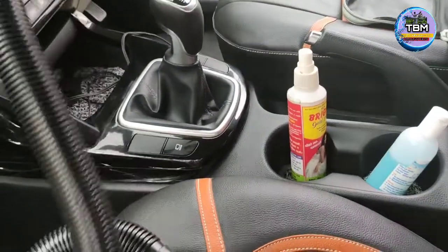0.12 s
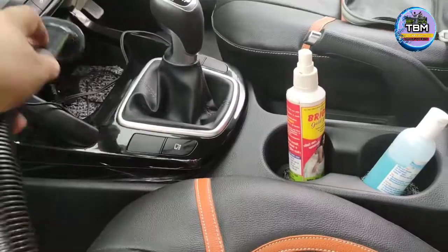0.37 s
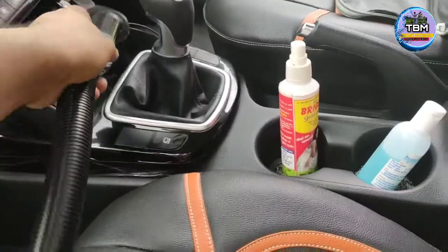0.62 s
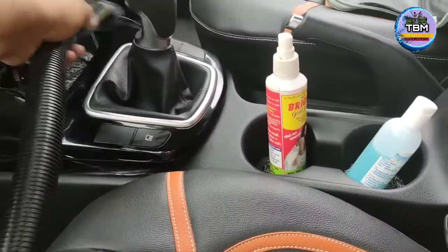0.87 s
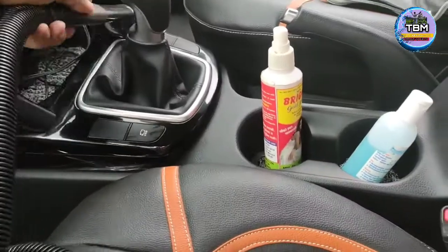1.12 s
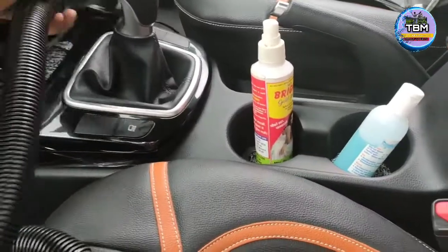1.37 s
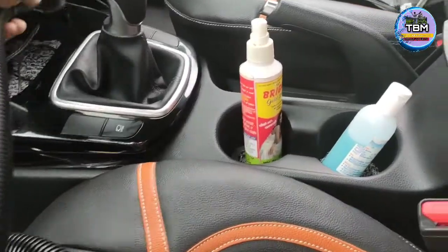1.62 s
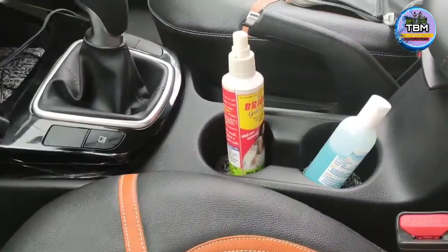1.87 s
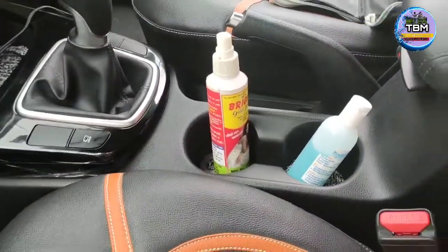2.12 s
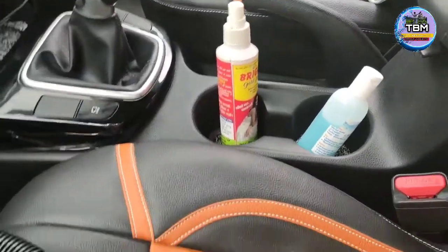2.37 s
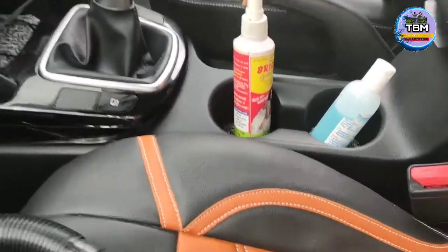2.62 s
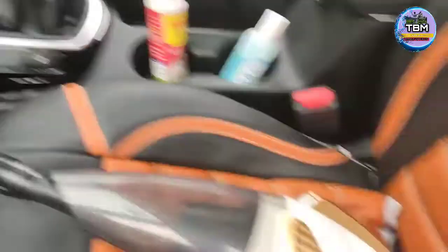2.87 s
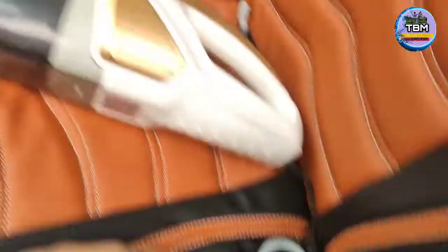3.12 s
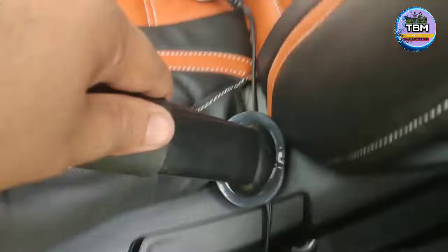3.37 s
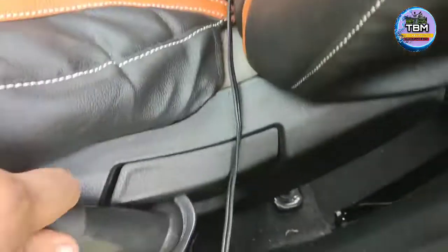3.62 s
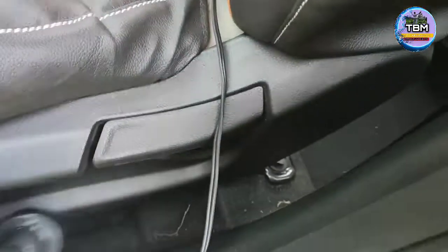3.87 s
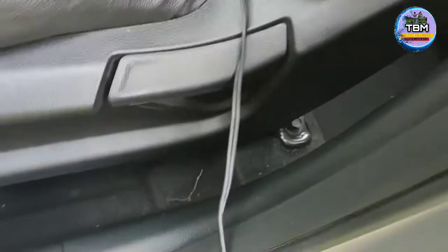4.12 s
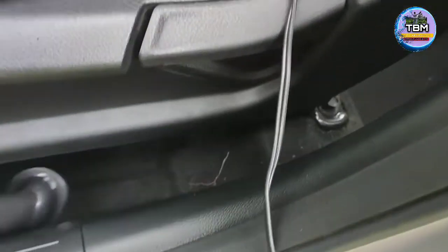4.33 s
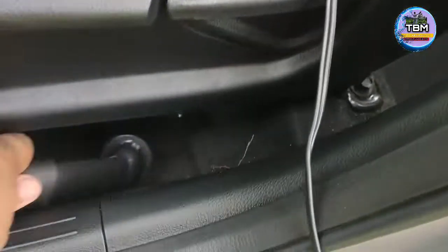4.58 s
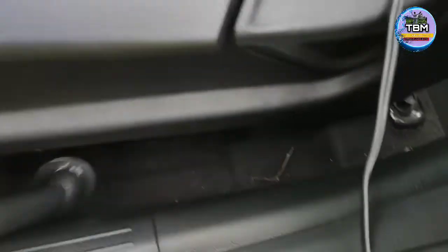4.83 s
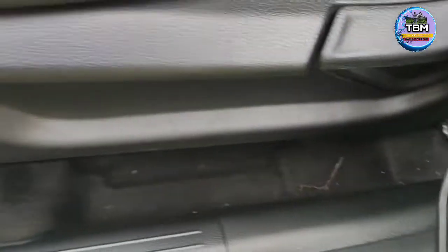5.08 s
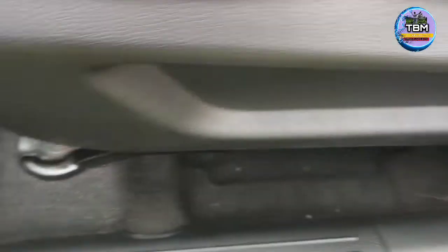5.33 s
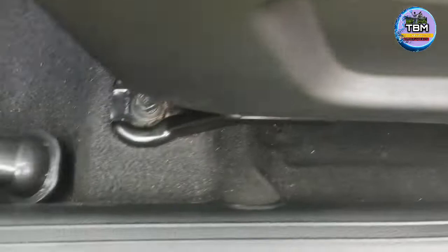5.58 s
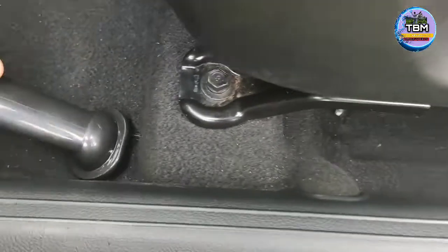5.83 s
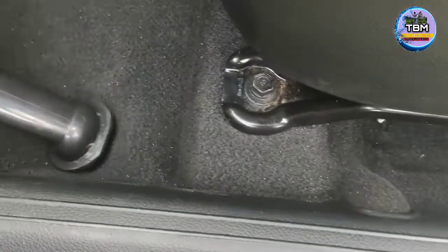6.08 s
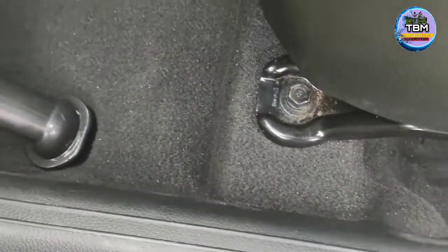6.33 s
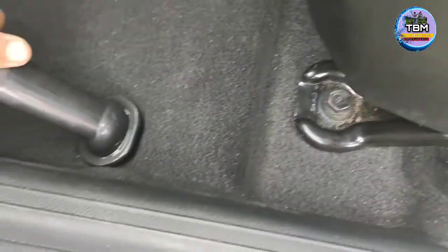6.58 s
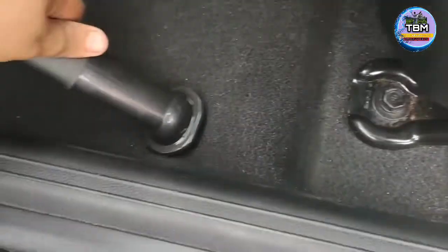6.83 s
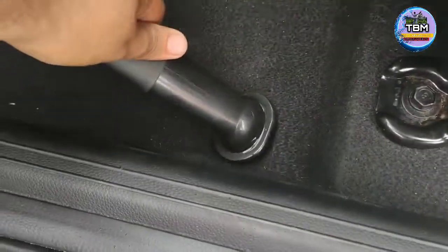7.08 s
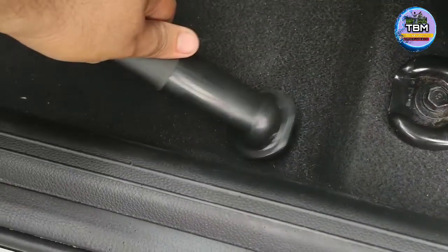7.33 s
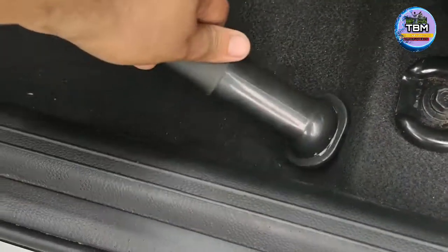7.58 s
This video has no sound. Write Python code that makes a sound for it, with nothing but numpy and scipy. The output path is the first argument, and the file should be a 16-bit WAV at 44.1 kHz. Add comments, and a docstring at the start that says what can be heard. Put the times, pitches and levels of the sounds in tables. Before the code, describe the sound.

A small vacuum cleaner runs steadily inside a car, whining and rushing with air, its whine swelling loud midway as the nozzle knocks against plastic trim.

```python
"""Handheld vacuum cleaner in a car cabin

A small vacuum cleaner runs while the listener moves from near the front seats, past the machine, down to the
floor. Shaft and fan tones are sines on multiples of one shaft angle, fading in the cabin's standing waves.
Air rushing through housing and hose, the dragging nozzle and the hiss at its gap are noise shaped in short
frames. The nozzle and hose bump the trim, which rings as decaying modes with a short cabin tail."""
import sys
import numpy as np
from scipy import signal
from scipy.io import wavfile
from scipy.ndimage import uniform_filter1d

SR = 44100
rng = np.random.default_rng(int(sys.argv[2]) if len(sys.argv) > 2 else 0)


def master(y):
    """Save y as 16-bit WAV."""
    cut = np.clip(np.atleast_2d(y).T, -1, 1)
    pcm = np.round(cut * 32767)  # scale
    wavfile.write(sys.argv[1], SR, pcm.astype(np.int16))


def invert_db(level):
    """Linear amplitude ratio for a level in decibels (20 dB per decade), elementwise."""
    return 10 ** (np.asarray(level, dtype=float) / 20)


N = 339570  # 7.7 s

# how the air moves: [t/s, rush/dB (only its changes count), rush left over right/dB, nozzle drag/dB]
AIRFLOW = [(0.0, -40.5, 4.5, -60), (0.6, -42, 4.5, -71), (0.9, -42, 8.5, -62), (1.2, -42.5, 9, -67),
           (1.75, -42, 6, -67), (2.17, -42.5, 5, -74), (2.81, -42.5, 4, -76), (3.15, -41, 9, -63),
           (3.37, -38.5, 3.5, -65), (3.8, -39.5, 6.5, -64), (4.07, -41, 5.5, -69), (4.27, -40.5, 5, -60),
           (4.63, -39, 8, -64.5), (4.93, -40.5, 7.5, -56.5), (5.21, -38.5, 5, -56),
           (5.36, -42.5, 10, -62.5), (5.6, -42.5, 9, -73), (5.9, -43, 7.5, -68), (6.75, -43.5, 3, -79),
           (7.7, -44.5, 2.5, -75)]


def evened(x):
    """Scales to an rms of 1."""
    return x / np.sqrt(np.mean(abs(x) ** 2) + 1e-20)


def over_hz(hz, table):
    """Columns of a table read on a log frequency axis."""
    f, *columns = np.transpose(table)
    return np.array([np.interp(np.log(hz + 1), np.log(f + 1), c) for c in columns])


def over_time(t, table):
    """Columns of a table read along time."""
    s, *columns = np.transpose(table)
    return np.array([np.interp(t, s, c) for c in columns])


def drift(t, top_hz, count=1):
    """Slow chance: sines of random phase up to top_hz, the slow ones strongest; rms 1."""
    hz = np.geomspace(top_hz / 30, top_hz, 16)
    phase = rng.random((count, 16, 1))  # in turns
    waves = np.sin(2 * np.pi * (hz[:, None] * t + phase)) / np.sqrt(hz[:, None])
    return evened(waves.sum(1))


def nearness(t):
    """Share of each of the three places along time, crossfading as the listener moves."""
    # where the listener is: [t/s, place (0 front seats, 1 beside the machine, 2 floor)]
    path = [(0, 0.27), (2.75, 0), (3.15, 1.02), (5.3, 0.96), (5.55, 2), (7.7, 2)]
    return np.clip(1 - abs(over_time(t, path) - np.arange(3)[:, None]), 0, 1)


def shaft_angle(t, coarse):
    """Running angle of the motor shaft in radians: its speed summed over time, with a little jitter."""
    # [t/s, shaft turns per second/Hz]
    speed = [(0.0, 409.5), (1.65, 409.35), (2.75, 409.3), (4.4, 410.1), (4.95, 409.8), (5.5, 409.9),
             (6.6, 410.7), (7.15, 410.4), (7.7, 410.4)]
    jitter_rad = 0.04 * drift(coarse, 40)[0]
    return 2 * np.pi * np.cumsum(over_time(t, speed)[0]) / SR + np.interp(t, coarse, jitter_rad)


def strong_tones(t, angle):
    """Shaft hum, its orders and the blade whine, as the standing waves bring them to each ear."""
    # all four: [t/s, left level/dB, right level/dB, left lead/rad]
    shaft_hum = [(0.0, -37.5, -46, -0.5), (0.3, -37, -50, 1), (0.42, -35, -43, 0), (0.6, -36.5, -51, -0.5),
                 (1.06, -36.3, -48, 0.8), (1.24, -38, -62, 0.5), (1.4, -37, -55, 0.5), (1.6, -37, -55, 0),
                 (1.82, -34, -43, 0.5), (2.18, -34, -41, -0.7), (2.46, -35, -53, 0), (2.8, -38, -62, -3),
                 (3.02, -37.5, -54, -1.5), (3.26, -43, -38.5, -1.7), (4.26, -42, -37, -0.95),
                 (4.78, -38.5, -32, -1), (5.14, -39, -33, 0), (5.42, -35.5, -34.5, 0),
                 (5.98, -34.5, -37, 0.53), (7.7, -35, -38.5, 0.5)]
    # second multiple of the shaft speed, same columns
    second_order = [(0.0, -45.5, -51, -0.7), (0.5, -47, -53, 0.3), (0.9, -49.5, -55, -1.5),
                    (1.7, -50, -58, -2), (1.95, -49, -55, 0.5), (2.9, -46.5, -53, 0.5), (3.5, -62, -55, 1),
                    (4.4, -51.5, -59, 0.5), (4.9, -48, -47, -1), (5.25, -63, -66, -1.5),
                    (6.3, -53, -62, 1.5), (7.7, -61, -58, 1.5)]
    # fourth multiple, same columns
    fourth_order = [(0.0, -48, -54, -2.5), (0.22, -44, -40, -2.5), (0.4, -51, -37.5, -4.5),
                    (0.74, -43, -45, -4.5), (1.0, -56, -42.5, -4.5), (1.22, -45, -36.5, -2.5),
                    (1.54, -47, -40, -4.5), (2.0, -45, -43.5, -5), (2.46, -56, -39, -3.5),
                    (2.62, -58, -33, -3.5), (2.95, -38.5, -46, -5), (3.12, -44, -41, -4),
                    (3.28, -41, -40, -1.5), (3.55, -44, -62, -3.5), (3.94, -55, -45, -2.6),
                    (4.25, -46.5, -55, -2), (4.42, -42, -50, -3.5), (4.75, -41, -44, -0.5),
                    (4.94, -37.5, -47, 0.5), (5.2, -44, -49, 3), (5.54, -49, -36.5, 4),
                    (5.72, -37, -37.5, 4), (6.42, -35, -46, 4.5), (6.75, -36.5, -58, 4.5),
                    (7.02, -38, -46, 3.5), (7.5, -39.5, -43, 3.7), (7.7, -42.5, -47, 3)]
    # seven fan blades pass per turn, same columns
    blade_whine = [(0.0, -38, -38, 4), (0.12, -40, -37, 3.5), (0.2, -35.5, -34, 0.8), (0.45, -37, -35, 1),
                   (0.62, -40, -36.3, -1), (0.82, -37, -35, 1.8), (1.2, -50, -41, 2), (1.4, -40, -39.5, 8),
                   (1.65, -39.5, -44, 7), (1.84, -51, -32.5, 4.3), (1.94, -39, -32.5, 7),
                   (2.1, -52, -37.5, 4.5), (2.3, -38, -37, 4), (2.54, -41, -35, 4), (2.72, -36, -38, 4),
                   (2.79, -32, -34, 5), (2.86, -36, -35, 2.5), (2.99, -34, -33, 3.5), (3.02, -34, -30, 4.5),
                   (3.06, -46, -32, 1), (3.1, -35.5, -31.5, 0.5), (3.26, -22.5, -34, -2),
                   (3.4, -25.5, -42, -3), (3.54, -24.5, -30, -3), (3.72, -25, -57, 0),
                   (3.9, -25, -45, -2.5), (4.05, -27.5, -33.5, -2.5), (4.58, -23.5, -33.5, -2),
                   (4.9, -25, -46, -1.5), (5.1, -23, -40, 0.5), (5.33, -24.5, -35, -0.1),
                   (5.38, -34, -49, 1.8), (5.46, -47, -31.5, 5), (5.53, -39, -35, 3), (5.62, -40, -36, 4.5),
                   (5.81, -36.5, -51, 3.6), (6.18, -36.5, -39, 4.5), (6.6, -36, -34, 4),
                   (6.88, -34.5, -50, 3), (6.98, -35, -39, 7.5), (7.1, -38.5, -43, 7),
                   (7.45, -38.5, -44, 7.5), (7.62, -40.5, -44, 4), (7.7, -35, -49, 5)]
    out = np.zeros((2, N))
    for order, table in ((1, shaft_hum), (2, second_order), (4, fourth_order), (7, blade_whine)):
        left_db, right_db, lead = over_time(t, table)
        phase = order * angle + np.array([lead, -lead]) / 2
        out += invert_db([left_db, right_db]) * np.sin(phase)
    return out


def faint_tones(t, coarse, angle):
    """Fainter multiples of the shaft speed; each fades and shifts in phase by chance in each ear."""
    # the faint tones' multiples of the shaft speed
    faint_orders = [5, 8, 10, 14]
    # their mean levels: [seats left/dB, right/dB, beside left/dB, right/dB, floor left/dB, right/dB]
    faint_levels = [(-46, -48, -51, -51.5, -53, -61), (-47, -58, -42, -48.5, -48, -58),
                    (-49, -56, -51.5, -54, -59, -68), (-49, -60, -52, -56, -50, -67)]
    # their mean left lead [rad]
    faint_leads = [1.26, 2.7, 2.6, 1.8]
    # fastest fading of each [Hz]
    faint_flutters = [40, 30, 12, 20]
    # the weak tones' multiples of the shaft speed
    weak_orders = [3, 6, 9, 11, 13, 15, 19, 20, 21, 22, 23, 24, 26, 27, 34]
    # their mean levels: [left/dB, right/dB]
    weak_levels = [(-54.5, -62.5), (-53, -58), (-54, -57), (-56.5, -66), (-60, -88), (-63, -61), (-66, -62),
                   (-68, -57.5), (-68, -75), (-78, -62), (-84, -83), (-79, -72), (-85, -64), (-75, -74),
                   (-75, -87)]

    tones = []
    near = nearness(coarse)
    for order, db, lead, top_hz in zip(faint_orders, faint_levels, faint_leads, faint_flutters):
        tones.append((order, np.reshape(db, (3, 2)).T @ near, 4.0, lead, top_hz))
    rush_db = over_time(coarse, AIRFLOW)[0]  # the weak ones rise and fall with the rush of air
    for order, db in zip(weak_orders, weak_levels):
        tones.append((order, np.array(db)[:, None] + rush_db - rush_db.mean(), 3.0, 0, 6))

    out = np.zeros((2, N))
    wander_rad = 1.1
    for order, level_db, fading_db, lead, top_hz in tones:
        fade, shift = drift(coarse, top_hz, count=4).reshape(2, 2, -1)
        for ear in range(2):
            level = np.interp(t, coarse, invert_db(level_db[ear] + fading_db * fade[ear]))
            phase = np.interp(t, coarse, wander_rad * shift[ear] + lead * (.5 - ear))
            out[ear] += level * np.sin(order * angle + phase)
    return out


def motor():
    """All tones ride on the same shaft angle, so they bend in pitch together."""
    t = np.arange(N) / SR
    coarse = np.arange(0, N + 256, 256) / SR
    angle = shaft_angle(t, coarse)
    tones = strong_tones(t, angle) + faint_tones(t, coarse, angle)
    return np.sqrt(2) * tones  # table levels are rms


def smoothed(noise, bins, frames):
    """Random field averaged over frequency bins, then over time frames; rms 1."""
    return evened(uniform_filter1d(uniform_filter1d(noise, size=bins, axis=0), size=frames, axis=1))


def air_rush(t, hz):
    """Spectrum of air rushing through housing and hose: a broad slope, peaks and dips, and random ripples."""
    # slope of the air noise: [f/Hz, seats left/dB per Hz, right, beside left, right, floor left, right]
    air_slope = [(30, -101, -101, -104, -104, -101, -101), (154, -99, -99, -97.5, -98, -99, -99),
                 (297, -84, -85.5, -107, -93, -86.5, -102), (490, -72.5, -71, -75.5, -75, -78.5, -82),
                 (1005, -82, -72.5, -73.5, -75.5, -77, -79.5), (1550, -76, -76, -73.5, -69, -73, -70),
                 (3180, -68, -74, -64.5, -70.5, -73, -79), (4080, -73.5, -82, -76, -76, -79.5, -77),
                 (5500, -73, -76.5, -72, -80.5, -75.5, -81.5), (7940, -74, -85, -75.5, -81, -80.5, -86),
                 (9420, -91.5, -83.5, -85.5, -89, -89.5, -95.5), (12700, -89, -97, -89.5, -100, -90, -99),
                 (15600, -99, -103, -100, -104, -102, -105), (15300, -122, -124, -122, -124, -124, -126)]
    # peaks (+) and dips (-) in the air noise's spectrum: [f/Hz, width/Hz, seats/dB, beside/dB, floor/dB]
    peaks_and_dips = [(295, 80, 3, 6, -13), (547, 210, -0.5, 0.5, -1), (707, 225, -12, 8.5, 1.5),
                      (804, 180, 8.5, -2, 6), (1040, 210, -7.5, 1, -2.5), (1205, 120, 0.5, 5.5, 6),
                      (1474, 240, 0.5, -8.5, -2), (1890, 280, 3.5, 4.5, 4.5), (2060, 97, 9.5, 2, 3.5),
                      (2613, 256, -15.5, -11, -11.5), (2895, 79, -1.5, 7, 3.5), (3275, 60, 5, -1, 1.5),
                      (3570, 150, 5.5, -9, 0), (3812, 79, 11, 5, 8.5), (4530, 99, 6.5, 5, 5.5),
                      (5170, 330, -2.5, -1, 0), (5840, 210, -5, -12, -15), (6900, 780, 1.5, 1.5, 2.5),
                      (9780, 280, -11, -14, 6)]
    near = nearness(t)
    centre, width, *height_db = np.transpose(peaks_and_dips)
    contour = np.exp(-np.square(2 * (hz[:, None] - centre) / width)) @ np.transpose(height_db)
    slope = over_hz(hz, air_slope).reshape(3, 2, -1).transpose(1, 2, 0)

    rush_db, pan_db, _ = over_time(t, AIRFLOW)
    # change about each place's mean
    rush_db, pan_db = (v - near.T @ (near @ v / near.sum(1)) for v in (rush_db, pan_db))
    treble = np.clip(hz / 4000, .3, 1)[:, None]  # distance and shadow act most on the treble
    moved_db = treble * (rush_db + np.array([pan_db, -pan_db])[:, None] / 2)

    p, q, r, s = rng.standard_normal((4, len(hz), len(t)))
    patches = np.array([smoothed(v, 12, 14) for v in (p, q)])
    comb = np.array([smoothed(v, 3, 90) for v in (r, s)])  # cabin reflections
    flicker = smoothed(p + r, 150, 4)  # broad and quick, alike in both ears
    ripple_db = 1.32 * patches + 2.3 * comb + 0.3 * flicker
    return invert_db((slope + contour) @ near + moved_db + ripple_db)


def nozzle_drag(t, hz):
    """Spectrum of the nozzle dragging on trim and carpet: a fixed colour that swells and fades."""
    # colour of the drag: [f/Hz, density over the drag level/dB]
    colour = [(30, -12), (100, -16), (200, -8), (350, 6), (700, 4), (1000, -16), (2000, -38)]
    drag_db = over_time(t, AIRFLOW)[2]
    per_hz = 10 * np.log10(210)  # drag level is that of a band 210 Hz wide
    return invert_db(over_hz(hz, colour)[0][:, None] + drag_db - per_hz)


def gap_hiss(t, hz):
    """Spectrum of the hiss at the nozzle's gap: one gliding band, mostly on the left."""
    # the nozzle passes: [t/s, centre f/Hz, level/dB before the band's shape]
    passing = [(2.8, 3430, -70), (2.95, 3700, -35), (3.1, 5100, -42.5), (3.2, 6100, -41), (3.4, 6900, -51),
               (3.7, 7000, -69), (4.4, 5500, -64), (4.699, 6000, -53), (5.051, 6220, -41), (5.2, 7200, -45),
               (5.33, 6900, -38), (5.48, 6340, -41.5), (5.7, 5870, -64)]
    width = 0.17  # of the band, on a natural log frequency axis
    hiss_hz, hiss_db = over_time(t, passing)
    distance = np.log((hz[:, None] + 1) / hiss_hz)
    band = np.exp(-np.square(distance / width)) / np.sqrt(width * hiss_hz)
    return invert_db(hiss_db) * band * invert_db([0, -14])[:, None, None]


def air():
    """Random short-time spectra give the three noises turbulence; the ears share it mostly in the bass."""
    # likeness of left and right: [f/Hz, share from 0 to 1]
    likeness = [(30, .8), (70, .92), (150, .98), (500, .97), (900, .9), (1500, .65), (3000, .5), (6000, .4),
                (15000, .3)]
    # delay between the ears: [t/s, left lag/samples]
    ear_lag = [(0, -6.5), (2.8, -3), (3.1, 11), (5.2, 6.5), (5.602, -15), (7.7, -15.5)]
    hz = np.fft.rfftfreq(1024, 1 / SR)
    t = np.arange(N // 256 + 5) * 256 / SR
    power = air_rush(t, hz) ** 2 + nozzle_drag(t, hz) ** 2 + gap_hiss(t, hz) ** 2

    a, b, c, d = rng.standard_normal((4, len(hz), len(t)))
    left, other = a + 1j * b, c + 1j * d
    same = np.clip(over_hz(hz, likeness)[0], 0, 1)[:, None]
    lag = np.exp(2j * np.pi * hz[:, None] * over_time(t, ear_lag) / SR)
    right = same * left * lag + np.sqrt(1 - same ** 2) * other
    z = np.array([left, right]) * np.sqrt(power)
    return signal.istft(z, SR, nperseg=1024, noverlap=768, scaling="psd")[1][:, :N]


def bumps():
    """Each bump rings the low, middle and high modes of the trim, a little retuned, in its own balance."""
    # nozzle and hose bump the trim: [t/s, thud/dB, knock/dB, crack/dB]
    hits = [(0.1, -49, -60, -69), (1.128, -51, -55, -60), (1.171, -44, -32.5, -52), (2.808, -50, -50, -60),
            (3.17, -50, -50, -62), (3.572, -47, -44, -50), (3.601, -40, -29, -29), (3.612, -46, -36, -40),
            (3.656, -45, -50, -60), (3.87, -57, -55, -60), (4.132, -44, -37, -48), (4.22, -41, -45, -60),
            (4.251, -48, -37, -50), (4.598, -50, -35, -57), (4.92, -50, -34, -55), (5.033, -33, -33, -55),
            (5.071, -45, -36, -48), (5.089, -46, -32, -42), (5.178, -57, -56, -55)]
    # modes of thud, knock and crack: [f before retuning/Hz, level within the part/dB, t60/s]
    trim_modes = [
        [(125, -10, 0.045), (175, 2, 0.052), (238.3, 1, 0.057), (312, 2.5, 0.047)],
        [(460, 0, 0.007), (605, 6, 0.028), (740, 0.5, 0.021), (890, -1, 0.02)],
        [(1280, -1, 0.01), (1760, 3.5, 0.009), (2250, 2, 0.01), (2890, 3, 0.008), (4500, -8, 0.01)],
    ]
    t = np.arange(SR // 5) / SR
    out = np.zeros(N + SR)
    for (s, *parts_db), chance in zip(hits, rng.random((len(hits), 3, 5))):
        for part_db, modes, tunes in zip(parts_db, trim_modes, chance):
            for (hz, db, t60), tune in zip(modes, tunes):
                onset = 1 - np.exp(-t * hz * 2)
                ring = np.sin(2 * np.pi * hz * (.88 + 0.31 * tune) * t) * onset
                out[round(s * SR):][:len(t)] += invert_db(part_db + db - 60 * t / t60) * ring
    # the bumps carry no deep bass
    return signal.sosfilt(signal.butter(3, 120, "high", fs=SR, output="sos"), out[:N])


def cabin(x):
    """Adds a short tail of sparse reflections, other ones for each ear; the bass stays alike."""
    t60_s = 0.055
    t = np.arange(SR // 5) / SR
    # most taps round to 0, the rest to +1 or -1
    taps = np.fix(rng.uniform(-1.1, 1.1, (2, len(t)))) * (t > .0015) * invert_db(-60 * t / t60_s)
    taps = taps / np.linalg.norm(taps[0])
    bright = 8 * np.diff(x, prepend=0)  # differencing keeps bass out of the tail
    return x + signal.fftconvolve(bright[None], taps, axes=1)[:, :N]


def scene():
    """Motor tones and air reach the ears directly; the bumps also through the cabin's tail."""
    return motor() + air() + cabin(bumps())


def roll_off(x):
    """The treble ends steeply here."""
    return signal.sosfilt(signal.butter(12, 15670, fs=SR, output="sos"), x)


def record(dry):
    """Delivers the finished mix."""
    return roll_off(dry)


dry = scene()
out = record(dry)
master(out)
```